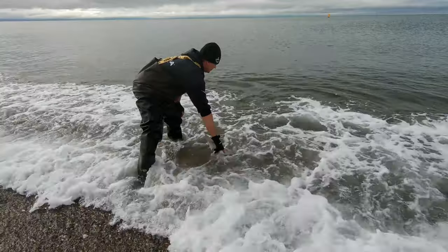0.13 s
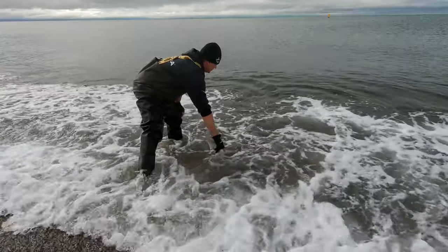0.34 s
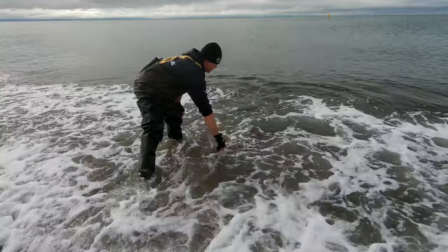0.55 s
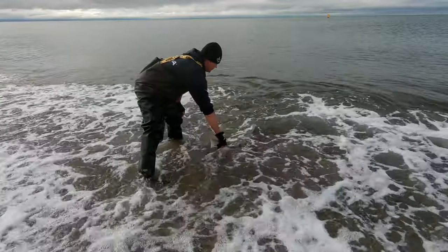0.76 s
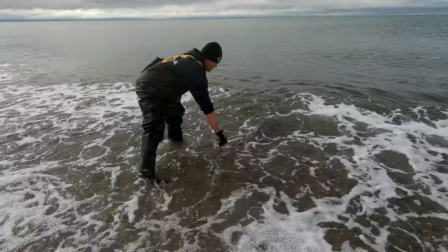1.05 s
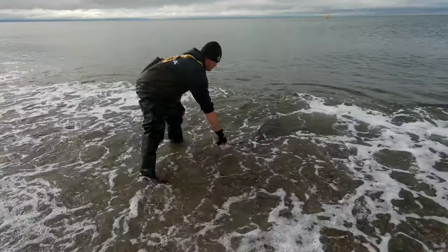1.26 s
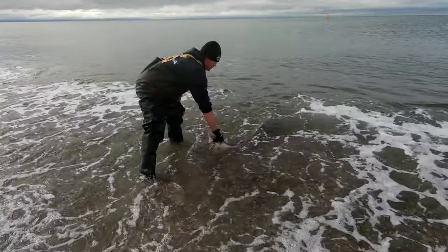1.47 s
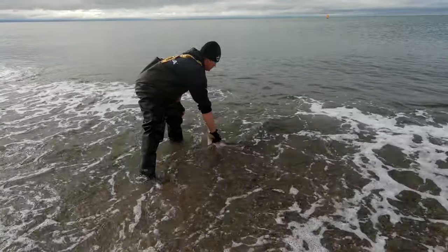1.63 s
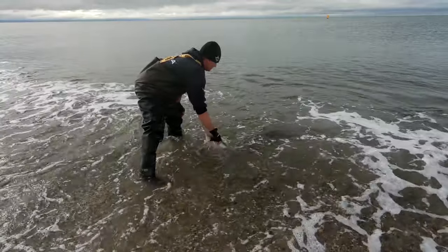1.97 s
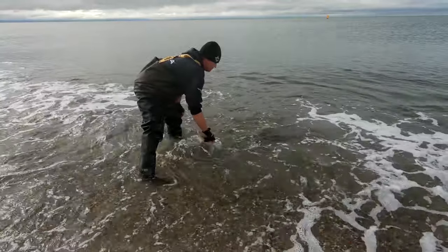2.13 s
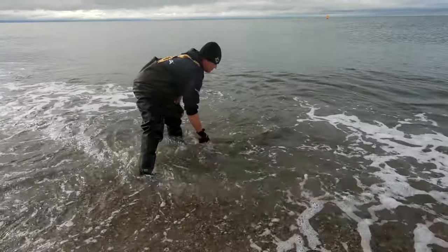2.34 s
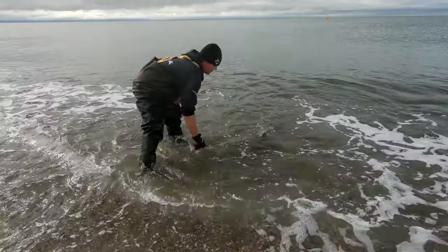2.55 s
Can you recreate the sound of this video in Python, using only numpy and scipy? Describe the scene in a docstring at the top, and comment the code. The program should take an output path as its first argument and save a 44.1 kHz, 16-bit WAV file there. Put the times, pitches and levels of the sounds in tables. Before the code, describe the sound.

Seawater surges over a pebble shore with a little wind on the microphone. The rush fades to a foamy hiss and soft churning, before the retreating water gurgles and slaps lightly in the shallows.

```python
"""A small broken wave rushes up a pebble beach and dies away, leaving its foam fizzing.
The shallows churn softly; then the backwash meets the next ripple with gurgles and small splashes.
The water sounds through trapped air: each bubble is a damped resonator, the smaller the higher.
Light wind rumbles on two microphone ports; the left is dull and out of phase with the right."""
import sys
import numpy as np
from scipy import signal
from scipy.fft import rfft, irfft, next_fast_len
from scipy.io import wavfile
from scipy.ndimage import uniform_filter1d

SR = 44100
rng = np.random.default_rng(int(sys.argv[2]) if len(sys.argv) > 2 else 0)


def master_out(mix):
    """Clip the mix to full scale and print it as 16-bit PCM to the path in sys.argv[1]."""
    frames = np.transpose(np.atleast_2d(mix))
    ceiling = np.clip(frames, -1, 1)
    pcm = np.round(ceiling * 32767).astype(np.int16)
    wavfile.write(sys.argv[1], SR, pcm)


N = 119070

# Envelopes of the continuous sources: (time [s], level [dB])
WIND_LEVEL = [(0, -58), (.1, -52), (.145, -46.5), (.2, -65), (.36, -57.5), (.64, -63.5), (.73, -60),
              (.8, -62), (.87, -55), (.96, -60), (1.03, -71), (1.18, -81), (1.31, -67), (1.38, -57),
              (1.46, -75), (2.55, -70.5), (2.64, -63), (2.69, -70)]  # at the right port
FLUTTER_LEVEL = [(0, -67), (.6, -54), (.72, -54), (.95, -50), (1.05, -71), (1.6, -77)]  # a gust in the left port
COLLAPSE_LEVEL = [(0, -36), (.06, -40), (.09, -40.5), (.14, -47), (.2, -56), (.32, -48), (.42, -53.5),
                  (.9, -93)]
SPATTER_LEVEL = [(1.95, -83), (2.15, -69), (2.258, -66), (2.275, -53), (2.32, -52.5), (2.35, -55),
                 (2.4, -67), (2.44, -52), (2.48, -65), (2.55, -65), (2.59, -54), (2.65, -66), (2.7, -52)]
CHURN_LEVEL = [(0, -58), (1.1, -55.5), (1.5, -49.5), (1.85, -48.5), (2.0, -49), (2.3, -56), (2.5, -59),
               (2.7, -50.5)]
GURGLE_LEVEL = [(0, -63), (1.9, -60.5), (2.07, -52), (2.255, -54), (2.275, -49.5), (2.32, -51), (2.35, -53),
                (2.39, -44.5), (2.43, -46.5), (2.46, -52), (2.52, -49), (2.6, -50), (2.64, -46.5),
                (2.7, -53)]
FIZZ_LEVEL = [(0, -37.5), (.7, -43.5), (1.05, -43), (1.35, -43.5), (1.7, -45.5), (2.2, -47), (2.7, -48)]
SURGE_LEVEL = [(0, -28.5), (.06, -30.5), (.12, -30), (.25, -31.5), (.335, -31), (.37, -34), (.45, -34),
               (.53, -34.5), (.6, -36.5), (.8, -39), (1.0, -43.5), (1.24, -45), (1.5, -51), (1.9, -58),
               (2.7, -53)]

# Spectral shaping of the same sources: (frequency [Hz], relative gain [dB])
WIND_SPECTRUM = [(10, -20), (25, -4), (42, 0), (85, -2.5), (130, -7), (300, -16), (1000, -46), (15000, -90)]
FLUTTER_SPECTRUM = [(60, -30), (170, -8), (250, 0), (340, 1.5), (600, -25), (15000, -90)]
COLLAPSE_SPECTRUM = [(30, -51), (65, -32), (105, -8), (170, -1), (260, -8), (600, -37), (15000, -90)]
SPATTER_SPECTRUM = [(300, -28), (1300, 1), (2500, -1), (3400, -0.5), (4500, -5), (7000, -20), (15000, -45)]
CHURN_SPECTRUM = [(30, -24), (70, -34), (110, -18), (155, 1.5), (220, -2), (300, -1.5), (450, 0), (700, -1),
                  (1100, -12), (2000, -20.5), (5000, -43), (15000, -59)]
GURGLE_SPECTRUM = [(100, -39), (400, -4.5), (650, 3), (950, 0), (1500, -6.5), (2200, -12.5), (3200, -16),
                   (4200, -22), (7000, -19), (15000, -32)]
FIZZ_SPECTRUM = [(100, -37), (1500, -7), (3000, -11.5), (4000, -14), (5000, -7), (5700, -3), (6500, -0.5),
                 (7500, -5), (8600, -5.5), (9300, -8.5), (10000, -15), (11000, -21.5), (12500, -27),
                 (15000, -33.5)]
SURGE_SPECTRUM = [(30, -55), (100, -43), (160, -7), (300, -2), (500, .5), (750, 2), (1000, -1.5),
                  (1220, -3.5), (1600, -6.5), (2200, -10), (3200, -12), (4100, -15.5), (6400, -8.5),
                  (8500, -21), (11000, -43), (15000, -80)]

# Water slapping against boots: (time [s], centre frequency [Hz], nominal peak [dB])
SLAP_EVENTS = [ (2.083, 1000, -37.5), (2.2955, 1300, -32.5), (2.324, 3500, -36), (2.6458, 2100, -32.5)]
# Splashes and glugs: (time [s], bubble pitch [Hz], nominal peak [dB], decay [s], spray share [0-1])
SPLASH_EVENTS = [ (.043, 716, -27, .006, 0.83), (.062, 855, -25.5, 0.007, 0.96),
                 (.310, 200.5, -34.5, .012, .3), (0.324, 1100, -29, .0061, 0), (.333, 283, -31.5, .012, 0),
                 (.505, 786, -31, .016, 1), (.626, 1380, -32.5, 0.0076, .9), (.644, 289, -39, 0.0055, 0.68),
                 (1.849, 192, -48.5, 0.023, .3), (1.961, 185, -48, 0.011, 0.6),
                 (2.017, 470, -39, .0065, .55), (2.024, 2730, -43.5, .003, 0.5),
                 (2.063, 1480, -39.5, 0.0033, 0.06), (2.083, 1420, -33.5, .0013, .55),
                 (2.117, 550, -43, .006, .4), (2.158, 1030, -36, 0.0022, 0.1),
                 (2.161, 675, -36.5, 0.0026, 0.2), (2.166, 380, -42.5, .009, 0.7),
                 (2.183, 1040, -38.5, .003, 0.4), (2.218, 433, -42, 0.015, 0.2),
                 (2.2615, 2700, -31, .0022, .2), (2.2655, 3100, -34.5, .002, .4),
                 (2.289, 208, -45.5, 0.021, 0.01), (2.2955, 1000, -34, .0028, .25),
                 (2.311, 2700, -44, 0.0044, 0.8), (2.3165, 3400, -38, .0025, .9),
                 (2.324, 4700, -40, .004, .8), (2.360, 3780, -46, .003, .3), (2.365, 820, -34, 0.0047, 0),
                 (2.386, 3050, -29.5, .0014, .12), (2.392, 750, -43, 0.0091, .9),
                 (2.412, 873, -39, .009, 0.7), (2.430, 700, -43, .007, .8), (2.487, 3400, -39, .0017, .6),
                 (2.562, 2900, -26, .0007, .2), (2.562, 990, -34.5, 0.0033, .1),
                 (2.564, 3740, -47, .002, .6), (2.577, 2850, -36, .0035, .3),
                 (2.602, 3330, -46, .0025, 0.2), (2.636, 2300, -45, .005, 0.94),
                 (2.648, 2530, -41, 0.0039, 1)]
# Left port relative to the right: (frequency [Hz], gain [dB], phase lead [rad], coherence [0-1])
LEFT_RESPONSE = [(60, 1, -4.5, 0.9), (175, -9, 1.04, 0.26), (302, -6, 1.5, .3), (407, -14, 2.5, 0.93),
                 (586, -10.5, 3.5, 0.94), (787, -4.5, 2.5, 0.96), (1050, -0.3, 2.5, 0.87),
                 (1980, -2, 1.96, 0.61), (2950, -2.5, 1.67, .95), (3820, -3.5, 1.26, 0.78),
                 (4730, -13.5, -0.5, 0.23), (5100, -25, 2, 0.5), (6500, -32.5, 0, 0), (8600, -32.5, 0, 0.1),
                 (11100, -19.5, 0, 0), (15000, -17, 0, 0)]

PITCH_RISE = .036  # fraction of its starting pitch that a bubble gains per decay time


def amp(db):
    """Amplitude ratio for a level in decibels."""
    return 10 ** (np.asarray(db) / 20)


def unit(x):
    """Normalisation to rms 1."""
    return x / np.sqrt(np.mean(x ** 2) + 1e-20)


def over_hz(table, hz, column=1):
    """Interpolation of a table column along log frequency."""
    table = np.array(table, float)
    return np.interp(np.log(hz + 1), np.log(table[:, 0] + 1), table[:, column])


def envelope(levels):
    """Gain per sample, interpolated in decibels."""
    return amp(np.interp(np.arange(N) / SR, *np.transpose(levels)))


def coloured(x, spectrum):
    """Zero-phase filtering by a spectral shape, at rms 1."""
    gain = amp(over_hz(spectrum, np.fft.rfftfreq(N, 1 / SR)))
    return unit(irfft(rfft(x) * gain, N))


def add(mix, start_s, sound):
    """Superposition of a sound on a mix, in place."""
    part = mix[..., round(start_s * SR):][..., :sound.shape[-1]]
    part += sound[..., :part.shape[-1]]


def blend(first, second, share):
    """Incoherent signals add in power; share is the fraction given to the first."""
    return np.sqrt(share) * first + np.sqrt(1 - share) * second


def patchy_noise(patch_db, patch_s, patch_hz, flicker_db):
    """Random modulation: two noises share time-frequency patches of level and a broadband flicker."""
    size, hop = 512, 128
    frames, bins = N // hop + 5, size // 2 + 1
    spectra = rng.standard_normal((2, frames, bins)) + 1j * rng.standard_normal((2, frames, bins))
    patch_frames = max(1, round(patch_s * SR / hop))
    patch_bins = max(1, round(patch_hz * size / SR))
    drift = uniform_filter1d(rng.standard_normal((frames, bins)), patch_frames, axis=0, mode="wrap")
    patches = unit(uniform_filter1d(drift, patch_bins, axis=1, mode="wrap"))
    flicker = unit(uniform_filter1d(rng.standard_normal((frames, 1)), size=7, axis=0))
    spectra *= amp(patch_db * patches + flicker_db * flicker)
    _, noise = signal.istft(spectra.swapaxes(1, 2), nperseg=size, noverlap=size - hop)
    return unit(noise[:, :N])


def bubbles(per_s, low_hz, high_hz, cycles, spread_db):
    """Bubble resonance: two random swarms of rising tones, each decaying by 1/e in `cycles` periods."""
    swarms = np.zeros((2, N))
    pitches = np.geomspace(low_hz, high_hz, num=24)
    for hz in pitches:
        age = np.arange(0, 6, hz / cycles / SR)  # in decay times
        shape = (1 - np.exp(-10 * age)) * np.exp(-age)
        ring = shape * np.sin(2 * np.pi * cycles * age * (1 + PITCH_RISE / 2 * age))
        chance = per_s / SR * np.sqrt(hz) / np.sqrt(pitches).sum()
        draw = rng.random((2, N))
        born = draw < chance
        excess = -np.log(draw[born] / chance + 1e-9)  # exponential: few bubbles are loud
        pops = np.zeros((2, N))
        pops[born] = amp(spread_db * np.minimum(excess, 4))
        swarms += np.sqrt(hz) * unit(signal.oaconvolve(pops, ring[None], axes=1)[:, :N])
    return unit(swarms)


def wind():
    """Turbulent pressure rumbles incoherently at the two ports; the left also flutters and knocks once."""
    eddies = patchy_noise(patch_db=1.5, patch_s=.06, patch_hz=200, flicker_db=1)
    left, right = envelope(WIND_LEVEL) * coloured(eddies, WIND_SPECTRUM)
    flutter = envelope(FLUTTER_LEVEL) * coloured(eddies[0], FLUTTER_SPECTRUM)
    left = amp(-9) * left + flutter
    hollow_knock = splash(hz=300, db=-32.5, decay_s=.007, spray=1)  # noise alone: a puff of air
    add(left, start_s=.838, sound=hollow_knock)
    return np.array([left, right])


def collapse():
    """The plunging front of the wave radiates low-frequency noise that dies away."""
    rumble = patchy_noise(patch_db=1, patch_s=.05, patch_hz=200, flicker_db=.5)
    return envelope(COLLAPSE_LEVEL) * coloured(rumble, COLLAPSE_SPECTRUM)


def spatter():
    """Droplets falling back onto the water excite sparse, high bubble resonances."""
    drops = bubbles(per_s=220, low_hz=1500, high_hz=4600, cycles=2.6, spread_db=1.8)
    return envelope(SPATTER_LEVEL) * coloured(drops, SPATTER_SPECTRUM)


def churn():
    """Large air pockets in the shallows are soft springs, so they oscillate at low frequencies."""
    pockets = bubbles(per_s=650, low_hz=135.6, high_hz=1406, cycles=3.6, spread_db=2)
    wash = patchy_noise(patch_db=-.5, patch_s=.054, patch_hz=306.3, flicker_db=-.3)
    shallows = blend(coloured(pockets, CHURN_SPECTRUM), coloured(wash, CHURN_SPECTRUM), share=.48)
    return envelope(CHURN_LEVEL) * shallows


def gurgle():
    """Air entrainment: the backwash sloshes and folds over into heavily damped bubbles."""
    patter = bubbles(per_s=1400, low_hz=380, high_hz=8340, cycles=2.2, spread_db=2.2)
    slosh = patchy_noise(patch_db=2.5, patch_s=.025, patch_hz=900, flicker_db=1.3)
    return envelope(GURGLE_LEVEL) * coloured(blend(patter, slosh, share=.49), GURGLE_SPECTRUM)


def slap(hz, db):
    """A flat impact of water is brief, hence broad in spectrum and without a ring."""
    return splash(hz, db, decay_s=.0011, spray=1, width_octaves=.6)


def splash(hz, db, decay_s, spray, width_octaves=.38):
    """A drop excites the damped resonance of a trapped bubble and throws band-limited spray noise."""
    t = np.arange(SR // 6) / SR
    attack_cycles = 1.1
    shape = (1 - np.exp(-(t * hz / attack_cycles) ** 2)) * np.exp(-t / decay_s)
    pitch = hz * (1 + PITCH_RISE * np.minimum(t / decay_s, 4))
    ring = np.sin(2 * np.pi * np.cumsum(pitch) / SR)
    octaves = np.log2((np.fft.rfftfreq(len(t), 1 / SR) + 1) / hz)
    band = np.exp(-.5 * (octaves / width_octaves) ** 2)
    puff = unit(irfft(rfft(rng.standard_normal(len(t))) * band, len(t)))
    rms = amp(db) * np.std(shape * ring) / shape.max()  # of a pure ring whose envelope peaks at db
    return rms * unit(shape * blend(puff, unit(ring), spray))


def fizz():
    """Tiny bubbles burst in the foam; their small radii put the resonances in the treble."""
    pops = bubbles(per_s=4900, low_hz=2414, high_hz=14200, cycles=3.4, spread_db=1)
    hiss = patchy_noise(patch_db=1.33, patch_s=.039, patch_hz=700, flicker_db=-.16)
    return envelope(FIZZ_LEVEL) * coloured(blend(pops, hiss, share=.28), FIZZ_SPECTRUM)


def surge():
    """White water tumbles over pebbles; bubbles of many sizes sum incoherently to a broadband rush."""
    swarm = bubbles(per_s=5000, low_hz=180.2, high_hz=9400, cycles=3.29, spread_db=1)
    wash = patchy_noise(patch_db=-.15, patch_s=.04, patch_hz=600, flicker_db=-.76)
    return envelope(SURGE_LEVEL) * coloured(blend(swarm, wash, share=.45), SURGE_SPECTRUM)


def ports(direct, diffuse):
    """Partial coherence: the right port gets direct sound; the left is dull, shifted and part diffuse."""
    size = next_fast_len(N + SR // 2)
    hz = np.fft.rfftfreq(size, 1 / SR)
    gain_db, lead, coherence = (over_hz(LEFT_RESPONSE, hz, column) for column in (1, 2, 3))
    shifted = np.exp(1j * lead) * rfft(direct, size)
    left_spectrum = amp(gain_db) * blend(shifted, rfft(diffuse, size), share=coherence ** 2)
    return np.array([irfft(left_spectrum, size)[:N], direct])


def scene():
    """Linear superposition: all the water sounds through the two ports, and the wind adds to it."""
    direct, diffuse = collapse() + surge() + fizz() + churn() + gurgle() + spatter()
    for start_s, hz, db, decay_s, spray in SPLASH_EVENTS:
        add(direct, start_s, splash(hz, db, decay_s, spray))
    for start_s, hz, db in SLAP_EVENTS:
        add(direct, start_s, slap(hz, db))
    return ports(direct, diffuse) + wind()


def record(dry):
    """Band limiting: a linear-phase low-pass filter removes the highest treble."""
    low_pass = signal.firwin(401, cutoff=15500, window=("kaiser", 9), fs=SR)
    return signal.oaconvolve(dry, low_pass[None], "same", axes=1)


dry = scene()
out = record(dry)
master_out(out)
```